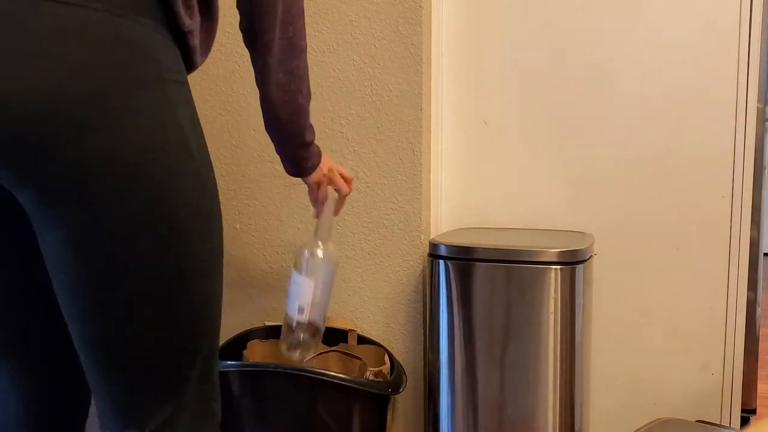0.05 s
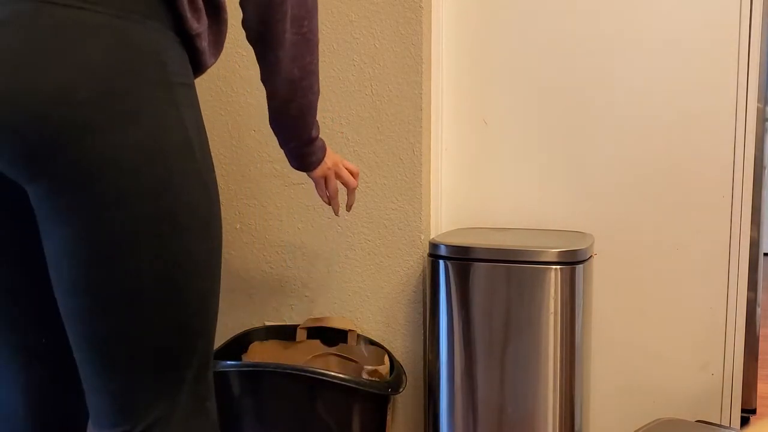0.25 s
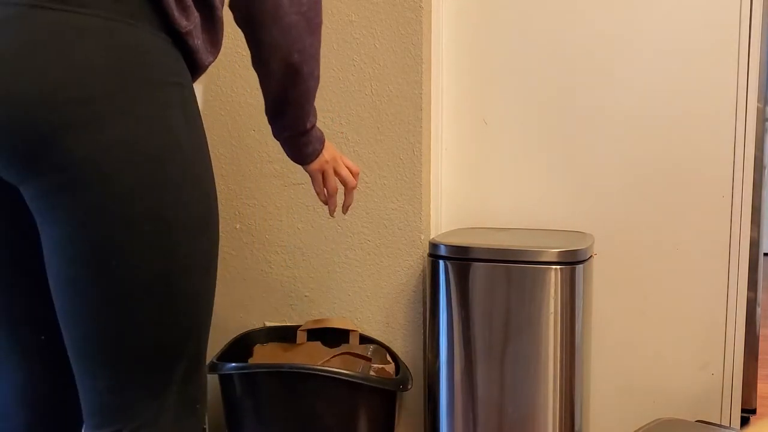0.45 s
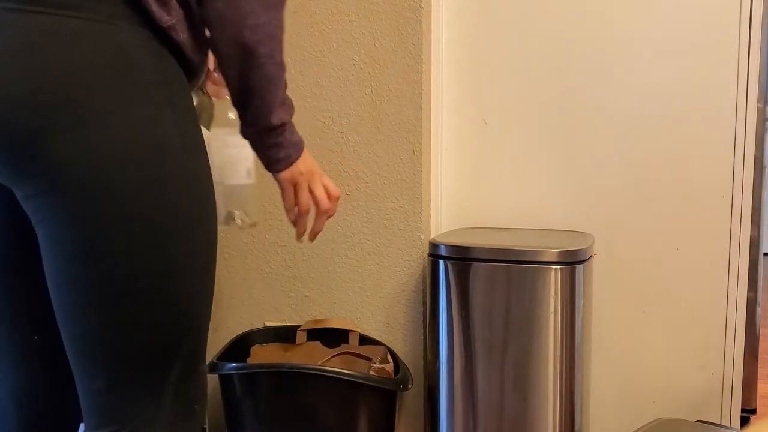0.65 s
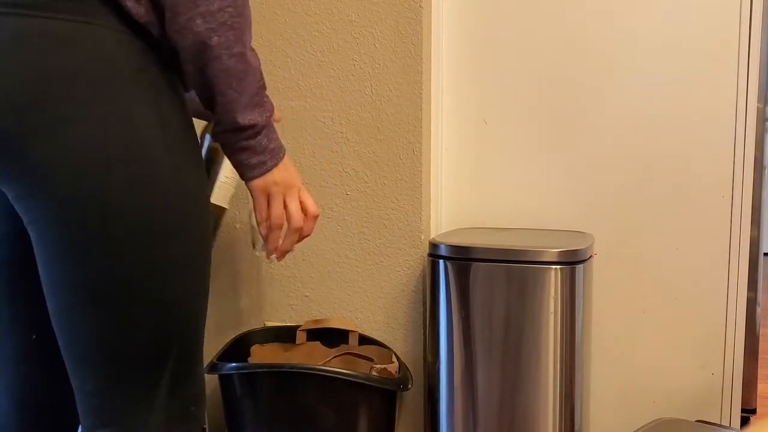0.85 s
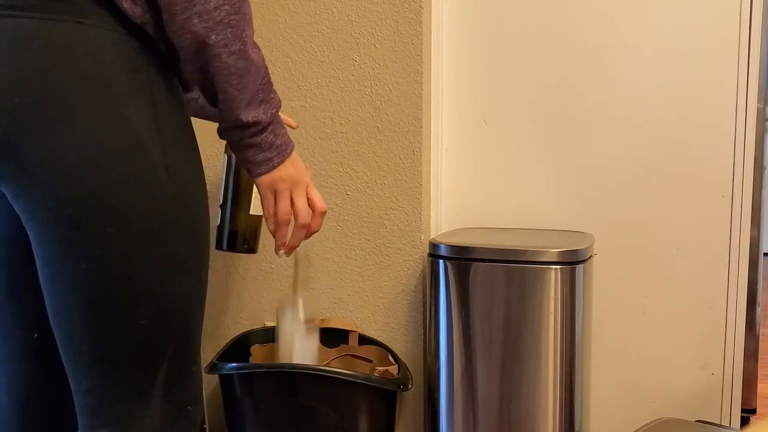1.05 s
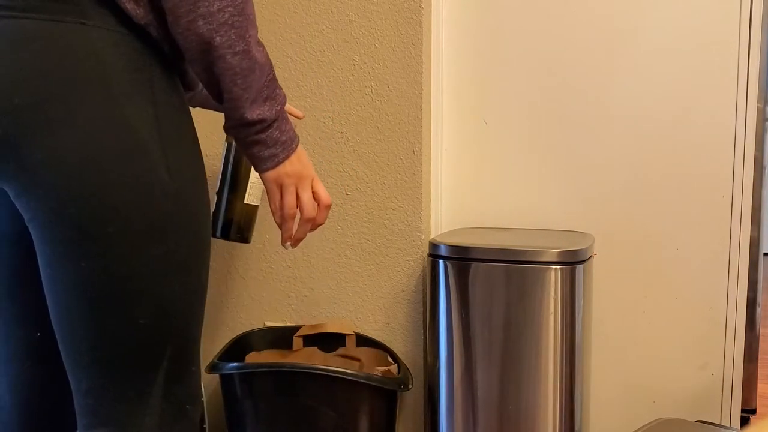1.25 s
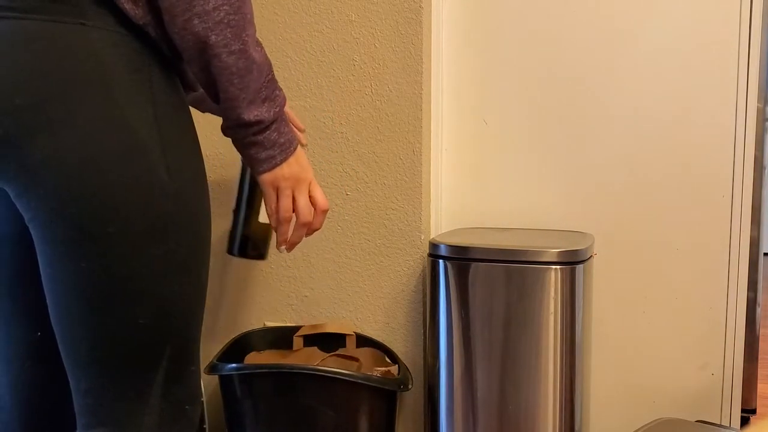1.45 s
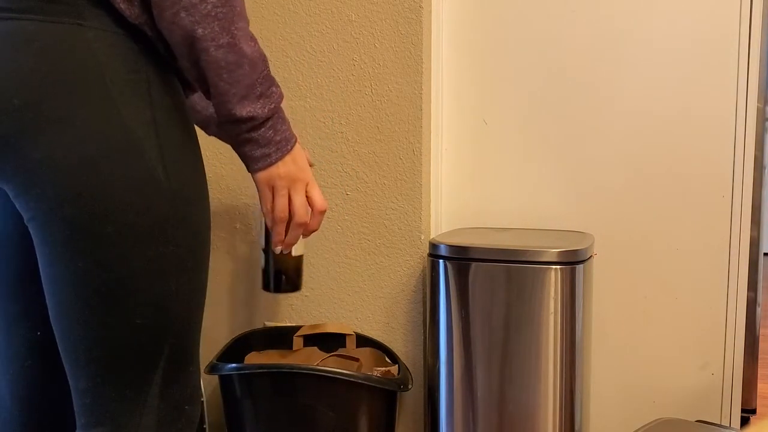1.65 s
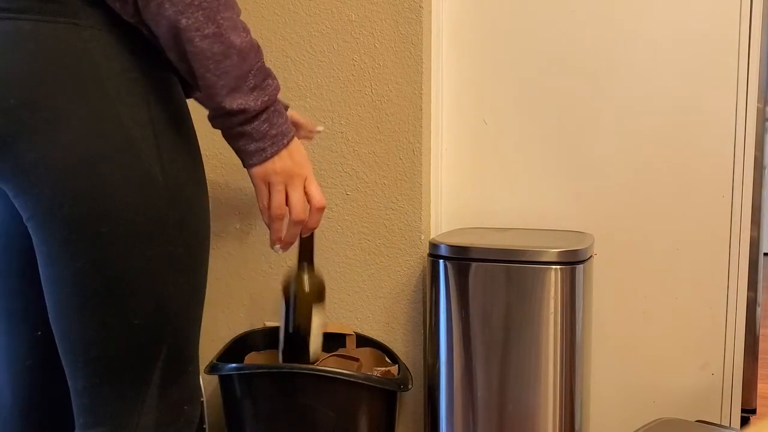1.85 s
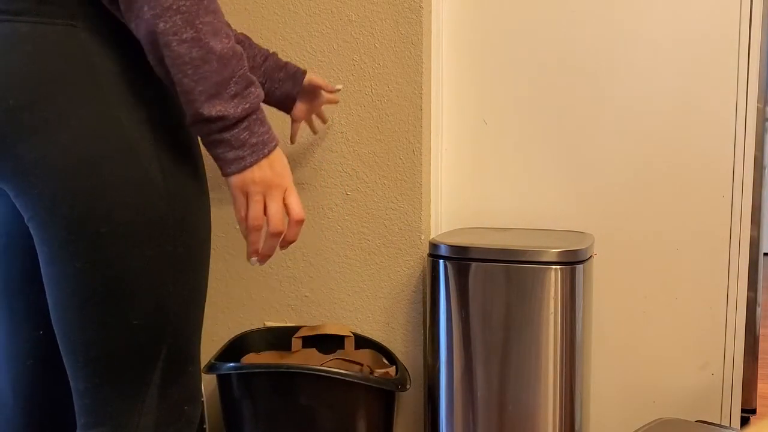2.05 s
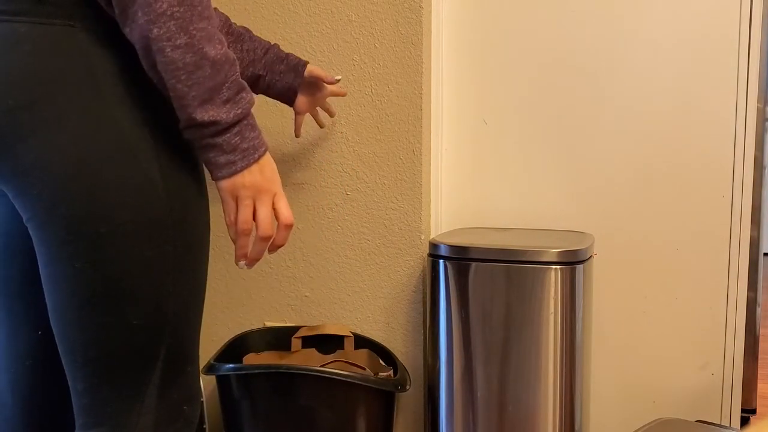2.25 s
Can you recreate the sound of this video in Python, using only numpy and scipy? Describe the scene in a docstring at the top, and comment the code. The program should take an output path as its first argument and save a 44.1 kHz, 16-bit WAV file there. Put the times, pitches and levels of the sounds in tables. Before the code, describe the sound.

Three empty glass bottles drop into a paper-lined plastic bin in a small, live kitchen. At 0.2 seconds the first crunches through paper and thuds. The bag settles and a sleeve brushes softly from 0.6 to 0.9. At 1.1 the second thuds and clinks against glass, leaving a brief low hum. At 1.9 the third lands with a brighter clatter of clinks and a fainter hum, settling by 2.3.

```python
"""Wine bottles into a kitchen bin

Three empty bottles drop one by one into a plastic bin lined with a paper bag, heard in stereo in a
small, live kitchen. The first crunches through the paper and thuds on the bottom; the next two also
clink against the glass already there and leave the air in a bottle humming. Between the drops the bag
settles and a sleeve brushes past."""
import sys
import numpy as np
from scipy import signal
from scipy.fft import rfft, irfft, next_fast_len
from scipy.io import wavfile

SR = 44100
rng = np.random.default_rng(int(sys.argv[2]) if len(sys.argv) > 2 else 0)


def inscribe(sig):
    """Save sig as 16-bit PCM at rate SR to the path in sys.argv[1].

    A 1-D sig is mono; a 2-D sig holds one channel per row.
    Samples are clipped to [-1, 1] before scaling.
    """
    pcm = np.round(np.clip(np.atleast_2d(sig).T, -1, 1) * 32767)
    wavfile.write(sys.argv[1], SR, pcm.astype(np.int16))


N = 105840
EVENT_SAMPLES = 32768
T = np.arange(EVENT_SAMPLES) / SR
HZ = np.fft.rfftfreq(EVENT_SAMPLES, 1 / SR)


def amp(db):
    """Decibels to amplitude."""
    return 10 ** (np.asarray(db) / 20)


def fade(t60_s, t=T):
    """Exponential decay of 60 dB in t60_s."""
    return np.exp(-np.log(1000) * t / np.maximum(t60_s, 1e-3))


def curve_at(points, hz):
    """Read (freq_hz, value) points along a log frequency axis."""
    freqs, values = np.transpose(points)
    return np.interp(np.log(hz + 1), np.log(freqs + 1), values)


def add(out, start_s, sound):
    """Mix a stereo event into out from start_s."""
    i = max(round(start_s * SR), 0)
    out[:, i:i + EVENT_SAMPLES] += sound[:, :max(N - i, 0)]


def colour(points):
    """Causal frequency response through (freq_hz, level_db) points."""
    cepstrum = irfft(np.log(amp(curve_at(points, HZ))))
    cepstrum[1:EVENT_SAMPLES // 2] *= 2
    cepstrum[EVENT_SAMPLES // 2 + 1:] = 0
    return np.exp(rfft(cepstrum))


# The kitchen's reverberation: freq_hz, t60_s
KITCHEN_DECAY = [(100, 0.31), (700, 0.46), (2500, 0.45), (6000, 0.41), (11000, 0.34), (16000, .28)]
# How alike that reverberation is on left and right: freq_hz, correlation
KITCHEN_LIKENESS = [(100, 0.93), (250, 0.89), (500, 0.73), (1000, 0.25), (2000, -0.14), (8000, -0.038)]
# The microphone's bass roll-off: freq_hz, gain_db
MIC_LOW_CUT = [(10, -45.5), (30, -28), (50, -9), (70, -8.5), (100, 4)]
BIN_ECHO_DB, BIN_ECHO_T60_S, LEFT_LEAD_S = 5, 0.098, 0.00009
BASS_DIRECT_GAIN, GLASS_DIRECT_GAIN = 1.1, 0.48  # the bin's low ring; glass at the open top


def path_to_mic(direct_gain=0.19):
    """Direct sound, quick echoes in the bin, then the kitchen's tail; more direct gain sounds closer."""
    hz, t, spectra = signal.stft(rng.standard_normal((2, EVENT_SAMPLES)), SR, nperseg=256)
    decay = fade(curve_at(KITCHEN_DECAY, hz)[:, None], t) + amp(BIN_ECHO_DB) * fade(BIN_ECHO_T60_S, t)
    spread = np.arccos(np.clip(curve_at(KITCHEN_LIKENESS, hz), -1, 1))[:, None] / 2
    spectra = spectra * decay * [np.cos(spread), np.sin(spread)]
    mid, side = signal.istft(spectra, SR, nperseg=256)[1][:, :EVENT_SAMPLES]
    tail = np.array([mid + side, mid - side])
    arrival = np.exp(-2j * np.pi * HZ * np.array([[0], [LEFT_LEAD_S]]))
    return (rfft(tail / np.linalg.norm(tail[0])) + direct_gain * arrival) * colour(MIC_LOW_CUT)


def at_mic(sound, path):
    """A sound at the end of its path, scaled to the energy of 40 ms at full level."""
    arrived = irfft(rfft(sound) * path)
    return arrived / np.sqrt(np.sum(arrived ** 2) / (2 * 0.04 * SR) + 1e-20)


def ring(modes, path, tilt_db_per_octave=0, twin_gain=0):
    """A struck body: damped modes, tilted by the hardness of the blow, each with an optional twin."""
    pitches_hz, levels_db, t60s = np.transpose(modes)
    tilt_db = tilt_db_per_octave * np.log2(pitches_hz / pitches_hz[0])
    scatter_db = rng.standard_normal(len(modes))
    gains = amp(levels_db + tilt_db + scatter_db)
    twins_hz = pitches_hz * (1 + 0.0078 * rng.standard_normal(len(modes)))  # near enough to beat
    out = 0
    for gain, hz, twin_hz, t60_s in zip(gains / np.linalg.norm(gains), pitches_hz, twins_hz, t60s):
        tone = np.sin(2 * np.pi * hz * T) + twin_gain * np.sin(2 * np.pi * twin_hz * T)
        out += gain * at_mic(tone * fade(t60_s), path)
    return out


def burst(spectrum, path, t60_s):
    """The short noise of a contact."""
    return at_mic(rng.standard_normal(EVENT_SAMPLES) * fade(t60_s), colour(spectrum) * path)


def steady_noise(spectrum, width=0.94):
    """Steady stereo noise of rms 1."""
    gains = amp(curve_at(spectrum, np.fft.rfftfreq(N, 1 / SR)))
    mid, side = irfft(rfft(rng.standard_normal((2, N))) * gains, N)
    pair = np.array([mid + width * side, mid - width * side])
    return pair / pair.std()


def rustle(strokes, spectrum, spiky_db, snaps_per_s=2900):
    """Dense tiny snaps under a rise and a fall; spiky_db spreads their strengths."""
    out = np.zeros((2, N))
    for start_s, rise_s, t60_s, level_db, tilt in strokes:
        snapping = rng.random(EVENT_SAMPLES) < snaps_per_s / SR
        snaps = snapping * rng.standard_normal(EVENT_SAMPLES)
        snaps *= amp(spiky_db * rng.standard_normal(EVENT_SAMPLES))
        swell = np.minimum(T / max(rise_s, 1e-4), 1) * fade(t60_s, np.maximum(T - rise_s, 0))
        tilted = [(hz, db + tilt * np.log2(hz / spectrum[0][0])) for hz, db in spectrum]
        add(out, start_s, amp(level_db) * at_mic(snaps * swell, colour(tilted) * path_to_mic()))
    return out


# The kitchen's room tone: freq_hz, relative_db
ROOM_TONE_SPECTRUM = [(10, -26.5), (35, 5), (100, -9), (200, -15), (360, -7), (520, -10.5), (800, -27),
                      (2000, -21.5), (6000, -27.5), (16000, -45)]
# Rumble of movement in the room: freq_hz, relative_db
RUMBLE_SPECTRUM = [(10, -25), (30, 8), (100, -8), (200, -11.5), (450, -14), (900, -25), (4000, -37.5)]
# That rumble's course at the microphone: time_s, level_db
RUMBLE_LEVELS = [(0, -57.5), (.5, -47), (.8, -51), (1.05, -54.5), (1.601, -75), (2.4, -69.5)]
ROOM_TONE_DB = -74


def room_tone():
    """Faint room noise and the low rumble of someone moving."""
    tone = amp(ROOM_TONE_DB) * steady_noise(ROOM_TONE_SPECTRUM)
    rumble_db = np.interp(np.arange(N) / SR, *np.transpose(RUMBLE_LEVELS))
    return tone + amp(rumble_db) * steady_noise(RUMBLE_SPECTRUM)


# Fingers on a bottle as it is held and let go: start_s, level_db
FINGER_TICKS = [(0.117, -64), (1.485, -67.5)]
# Lightly touched glass: pitch_hz, relative_db, t60_s
TOUCH_MODES = [(3743, -3.5, .035), (4000, -7, .03), (4570, -9, .035)]


def finger_ticks():
    """A light touch rings only a few short, high modes of the glass."""
    out = np.zeros((2, N))
    for start_s, level_db in FINGER_TICKS:
        add(out, start_s, amp(level_db) * ring(TOUCH_MODES, path_to_mic()))
    return out


# Bottles hitting the inside of the bin: start_s, bottom_db, wall_db, slap_db
BIN_BLOWS = [(0.195, -32, -30, -28.5), (.211, -30, -19.5, -21), (.231, -27, -16, -23.5),
             (.259, -27.5, -17, -31.5), (.277, -16.5, -21, -26), (0.311, -24.5, -32, -32),
             (0.404, -36.5, -53, -71), (.468, -31.5, -37, -63), (0.488, -43.5, -52.5, -58),
             (.836, -35.5, -52.5, -62), (1.087, -51, -27, -20), (1.107, -30, -15.5, -22),
             (1.129, -24.5, -16, -19.5), (1.152, -18, -36.5, -21), (1.171, -15, -37.5, -29),
             (1.243, -24, -31.5, -40), (1.284, -24.5, -39.5, -39.5), (1.327, -32.5, -46, -47),
             (1.888, -28.5, -28, -24), (1.927, -19, -28.5, -27.5), (1.943, -20, -25, -25.5),
             (1.96, -42, -41.5, -24), (1.972, -18, -26, -25.5), (1.992, -23, -33, -23),
             (2.217, -44, -56.5, -45)]
# The boom of the bottom and the knock of the wall: pitch_hz, relative_db, t60_s
BOTTOM_MODES = [(125.3, -10, 0.09), (180.9, 4.5, 0.15), (212, -2.5, .11)]
WALL_MODES = [(263, 1.5, 0.026), (309, -8, 0.17), (364.7, 5.5, 0.12), (394.2, 2, 0.074),
              (477.3, -1.5, 0.05), (500.8, -9.5, 0.08), (545, -8.5, 0.42)]
# Glass slapping plastic: freq_hz, relative_db
SLAP_SPECTRUM = [(20, -48.5), (80, -17), (200, -6), (550, 2), (750, -0.5), (1600, 5), (2300, -7),
                 (3400, -7), (5000, -16.5), (8500, -24), (15000, -31)]
FIRM_SLAP_DB, DULL_ABOVE_HZ = -20, 1300


def bin_thuds():
    """Each blow slaps the plastic and rings the bin's bottom and wall; softer slaps lose treble."""
    out = np.zeros((2, N))
    for start_s, bottom_db, wall_db, slap_db in BIN_BLOWS:
        path = path_to_mic()
        tilt = 0.28 * min(slap_db - FIRM_SLAP_DB, 0)  # dB per octave
        slap = [(hz, db + tilt * np.log2(max(hz / DULL_ABOVE_HZ, 1))) for hz, db in SLAP_SPECTRUM]
        add(out, start_s, amp(bottom_db) * ring(BOTTOM_MODES, path_to_mic(BASS_DIRECT_GAIN)))
        add(out, start_s, amp(wall_db) * ring(WALL_MODES, path))
        add(out, start_s, amp(slap_db) * burst(slap, path, t60_s=0.016))
    return out


# The bag crumpling in the bin: start_s, rise_s, t60_s, level_db, tilt_db_per_octave
PAPER_CRUNCHES = [(.195, 0.00034, .06, -29, 1), (.205, 0.028, .15, -25, 1), (.257, 0.0035, 0.045, -21.5, 0),
                  (.335, 0.016, .05, -40, 3), (.462, 0.0028, .035, -51.5, 2.5), (.58, 0.068, .11, -49.5, 1),
                  (.74, 0.081, .12, -55, 0.5), (.83, .03, .06, -50.5, 3), (1.235, 0.033, .05, -41, -1),
                  (2.10, 0.0099, .069, -47, -9)]
# Crackling paper: freq_hz, relative_db
PAPER_SPECTRUM = [(200, -4.5), (800, 7), (2000, 8), (3000, 1.5), (4300, -2), (6000, -7), (9000, -12),
                  (13000, -7.5), (16000, -15)]


def paper_bag():
    """The paper crumples and settles in snaps of very uneven strength."""
    return rustle(PAPER_CRUNCHES, PAPER_SPECTRUM, spiky_db=4.5)


# The bin bumping the kitchen floor: start_s, level_db
FLOOR_BUMPS = [(.2, -40), (0.257, -21.5), (0.473, -36.5), (0.547, -49), (.698, -44.5), (.765, -47.5),
               (1.128, -35), (1.166, -29.5), (1.932, -34), (1.972, -31.5)]
# Low ring of the whole bin: pitch_hz, relative_db, t60_s
ROCKING_MODES = [(68, -6, .09), (84.2, 1.5, 0.25), (97, -3.5, .11)]


def bin_rocking():
    """The whole bin rocks on the floor, and each bump rings its lowest modes."""
    out = np.zeros((2, N))
    for start_s, level_db in FLOOR_BUMPS:
        add(out, start_s, amp(level_db) * ring(ROCKING_MODES, path_to_mic(BASS_DIRECT_GAIN)))
    return out


# A sleeve passing between drops: start_s, rise_s, t60_s, level_db, tilt_db_per_octave
SLEEVE_BRUSHES = [(.65, 0.029, 0.043, -38, 0), (.825, 0.012, 0.19, -40, -1), (.88, 0.014, 0.097, -39, -1.5)]
# Rubbing cloth: freq_hz, relative_db
CLOTH_SPECTRUM = [(60, -8.5), (240, -1.5), (400, 2.5), (800, -9), (1700, -2), (2600, -16.5), (5000, -25.5),
                  (15000, -52.5)]


def sleeve():
    """Cloth brushes past, its more even snaps blurring into a dull swish."""
    return rustle(SLEEVE_BRUSHES, CLOTH_SPECTRUM, spiky_db=0.5)


# Square landings on the pile: start_s, level_db
BASE_LANDINGS = [(1.090, -27), (1.889, -19)]
# The clunk of a bottle's base: freq_hz, relative_db
CLUNK_SPECTRUM = [(60, -30), (250, -4), (520, 6), (900, 5), (1700, 0), (3300, -19.5), (6000, -40),
                  (15000, -51)]


def base_clunks():
    """A bottle's heavy base gives the pile one sharp push, heard through the bin and the room."""
    out = np.zeros((2, N))
    push = signal.unit_impulse(EVENT_SAMPLES)
    for start_s, level_db in BASE_LANDINGS:
        add(out, start_s, amp(level_db) * at_mic(push, colour(CLUNK_SPECTRUM) * path_to_mic()))
    return out


# Glass on glass at the bin's open top: start_s, first_db, second_db, third_db, tilt_db_per_octave
GLASS_CONTACTS = [(1.091, -29, -17, -104, 1.5), (1.153, -22.5, -24.5, -90, 5), (1.187, -44, -33.5, -90, -4),
                  (1.276, -33.5, -31.5, -90, -12), (1.301, -45, -37, -90, -26),
                  (1.889, -31.5, -32.5, -18.5, -2.5), (1.915, -44, -68, -17, -2),
                  (1.958, -55.5, -36, -19.5, 0), (1.964, -44, -17.5, -22.5, 7),
                  (1.978, -22, -31, -15.5, -6.5), (2.022, -42, -49, -16.5, -4),
                  (2.215, -49.5, -49.5, -63, 1.5)]
# The ring of each bottle: pitch_hz, relative_db, t60_s
FIRST_BOTTLE = [(2611, -7, .2), (2690, 1.5, .38), (5356, -2, .3), (5556, -6, .28), (6961, -14, .24),
                (9604, -7, .13), (2815, -6, .2), (6550, -12, .15), (7510, -13, .18), (9378, -11, .15),
                (11390, -11, .15), (13350, -16, .14), (14600, -18, .1), (15340, -16, .12)]
SECOND_BOTTLE = [(2756, 5, .14), (5556, -3, .15), (6202, -2, .14), (6330, -3, .07), (7483, -8, .14),
                 (2812, -5, .08), (3330, -11, .025), (3730, -11, .019), (4350, -15, .025), (7340, -14, .08),
                 (10350, -7, .04), (11650, -13, .06), (12040, -13, .08), (13100, -10, .037),
                 (14400, -15, .04)]
THIRD_BOTTLE = [(2751, 14, .19), (2810, 0, .18), (2896, -3, .24), (5748, 2, .18), (7020, -3, .12),
                (7219, -3, .14), (2690, -2, .1), (9500, -5, .06), (10050, -4, .05), (10720, 1, .08),
                (11140, -2, .08), (12900, -3, .05), (13350, -3, .06), (14800, -3, .05), (15350, -3, .05)]
# The click of contact: freq_hz, relative_db
CLICK_SPECTRUM = [(500, -22.5), (2000, -3), (2800, 3), (3900, -10), (5000, -17), (6200, 5.5), (7400, -1),
                  (8300, -26.5), (9600, -0.5), (15500, -8.5)]
SILENT_DB, TWIN_DB, CLICK_RELATIVE_DB = -70, -0.5, -17


def glass_clinks():
    """Each contact clicks and rings the bottles that touch; not quite round, they have twin modes."""
    out = np.zeros((2, N))
    corner_hz = FIRST_BOTTLE[0][0]
    for start_s, *levels_db, tilt in GLASS_CONTACTS:
        path = path_to_mic(GLASS_DIRECT_GAIN)
        for level_db, modes in zip(levels_db, (FIRST_BOTTLE, SECOND_BOTTLE, THIRD_BOTTLE)):
            if level_db > SILENT_DB:
                add(out, start_s, amp(level_db) * ring(modes, path, tilt, twin_gain=amp(TWIN_DB)))
        click_tilt = min(tilt, 0) / 2  # a dull clink has a dull click
        click = [(hz, db + click_tilt * np.log2(max(hz / corner_hz, 1))) for hz, db in CLICK_SPECTRUM]
        add(out, start_s, amp(max(levels_db) + CLICK_RELATIVE_DB) * burst(click, path, t60_s=0.015))
    return out


# The hollow hum of a bottle, dry and centred: start_s, pitch_hz, level_db, t60_s
AIR_HUMS = [(1.164, 106.7, -16.5, 0.56), (1.948, 106.4, -23.5, .62)]
HUM_RISE_T60_S = 0.27


def bottle_air():
    """The landing sets the air in the bottle's neck swinging."""
    out = np.zeros((2, N))
    for start_s, pitch_hz, level_db, t60_s in AIR_HUMS:
        swell = fade(t60_s) - fade(HUM_RISE_T60_S)
        hum = np.sin(2 * np.pi * pitch_hz * T) * swell
        add(out, start_s, amp(level_db) * np.tile(hum, (2, 1)))
    return out


def scene():
    """Paper, sleeve, bin and bottles over the quiet kitchen, as they reach the microphone."""
    rustles = paper_bag() + sleeve()
    plastic = bin_thuds() + bin_rocking()
    bottles = base_clunks() + glass_clinks() + bottle_air() + finger_ticks()
    return rustles + plastic + bottles + room_tone()


def record(dry):
    """The recorder rounds off the highest peaks and keeps nothing above its band limit."""
    rounded = dry / (1 + np.abs(dry) ** 6) ** (1 / 6)
    size = next_fast_len(N + EVENT_SAMPLES)
    band_limit_hz = 16000
    low_pass = 1 / (1 + (np.fft.rfftfreq(size, 1 / SR) / band_limit_hz) ** 200)
    return irfft(rfft(rounded, size) * low_pass, size)[:, :N]


dry = scene()
out = record(dry)
inscribe(out)
```